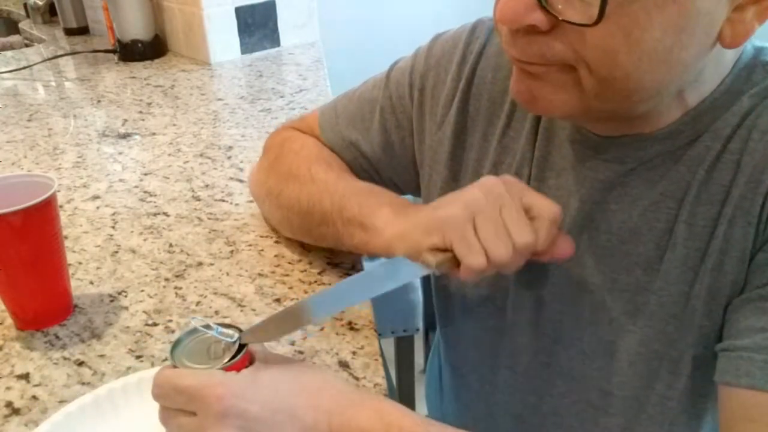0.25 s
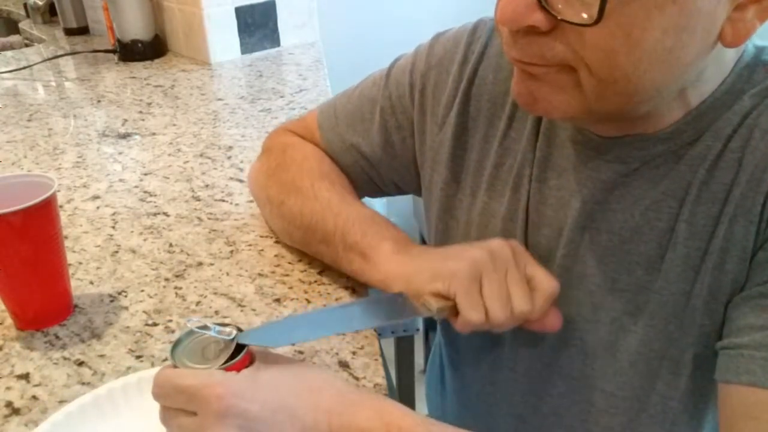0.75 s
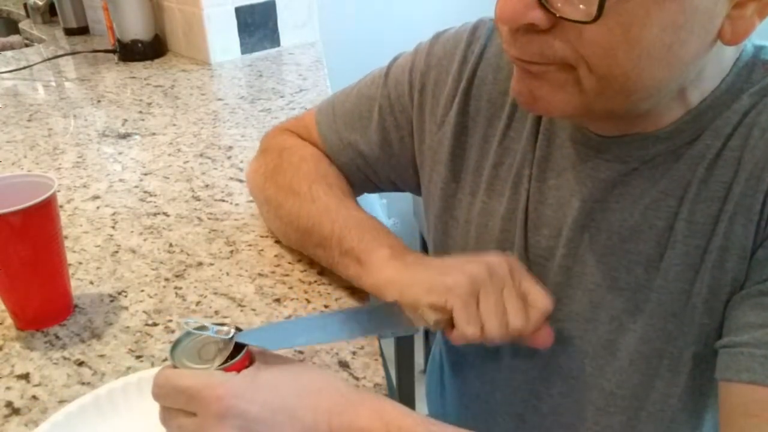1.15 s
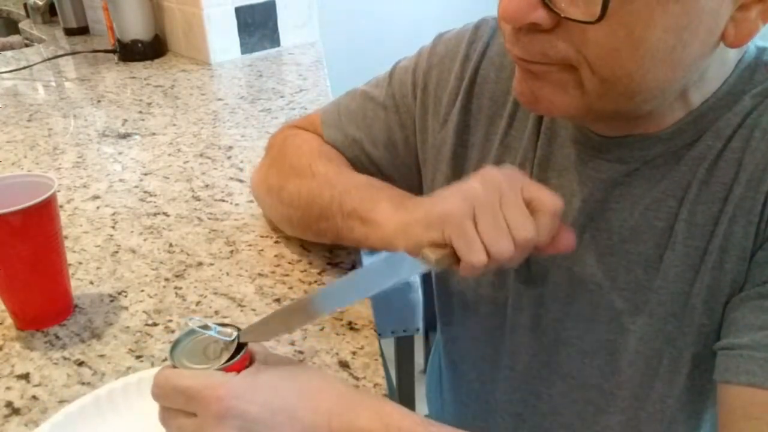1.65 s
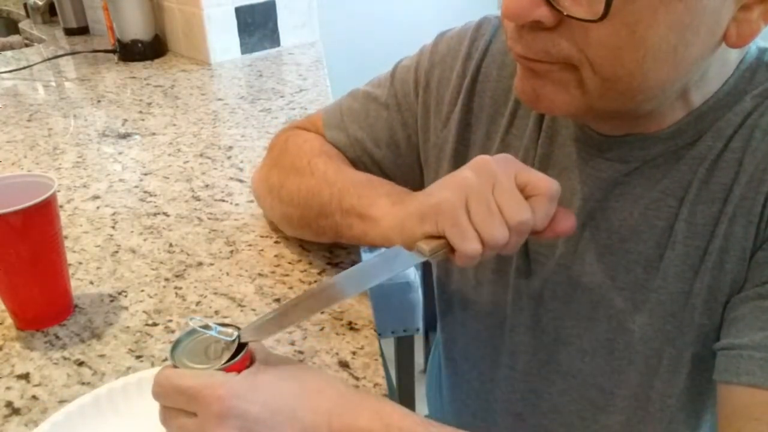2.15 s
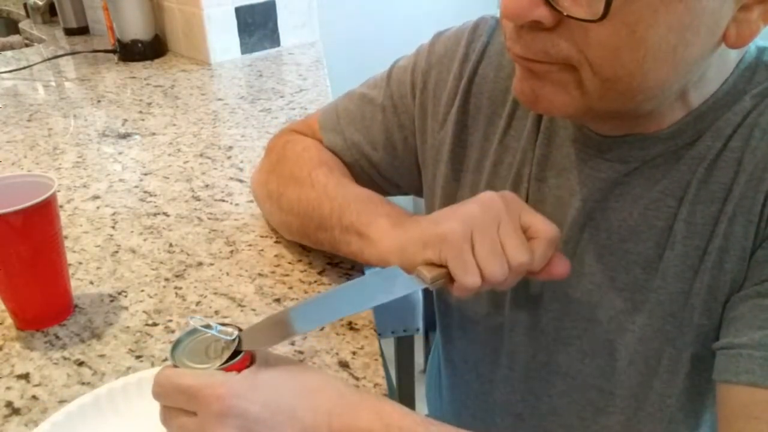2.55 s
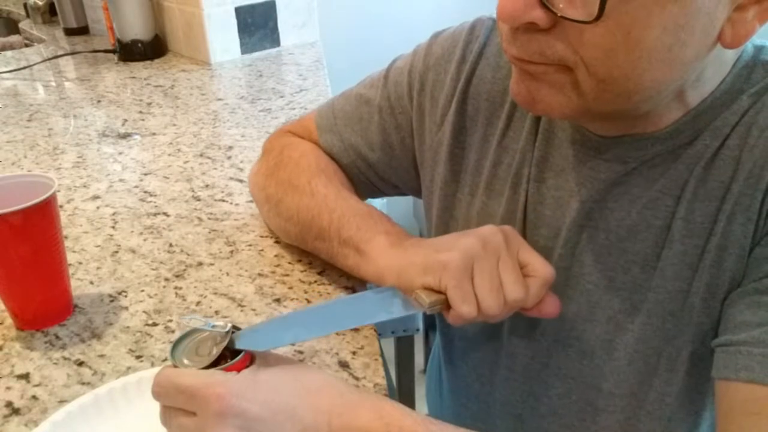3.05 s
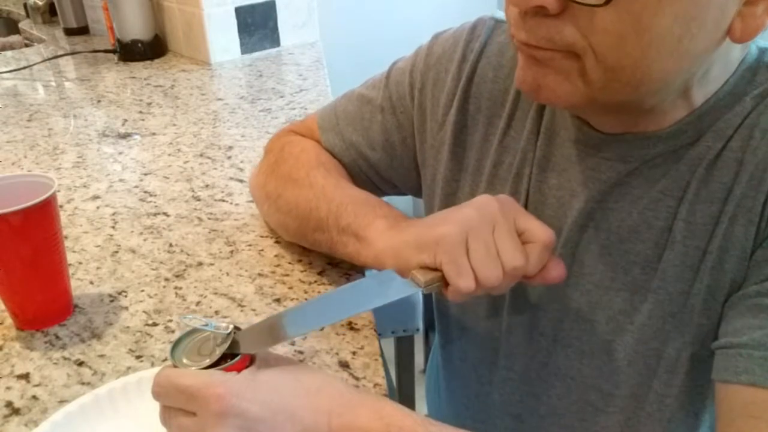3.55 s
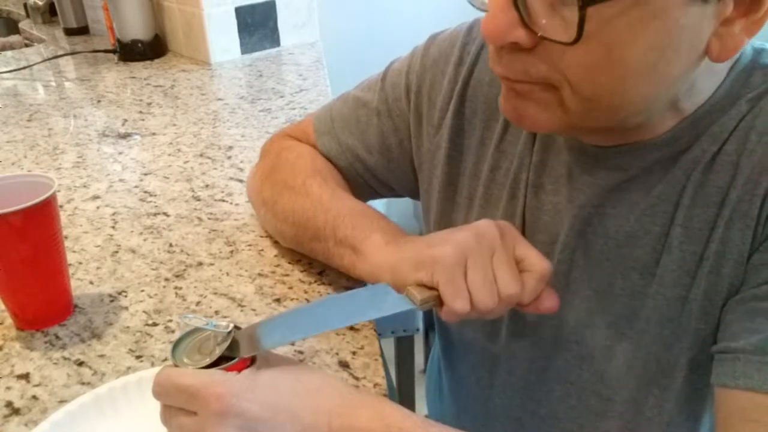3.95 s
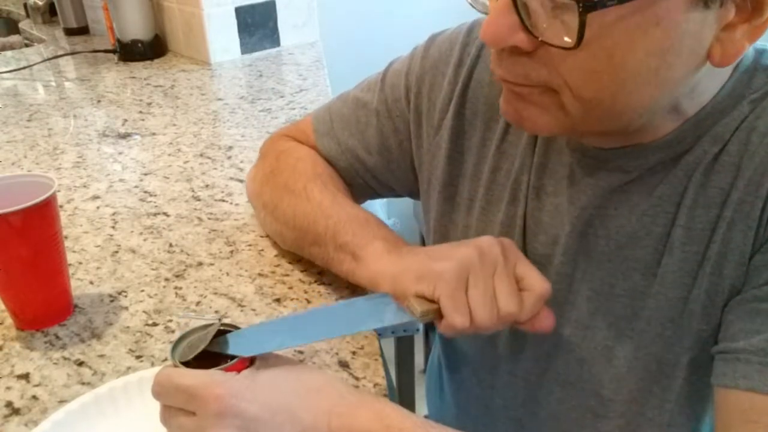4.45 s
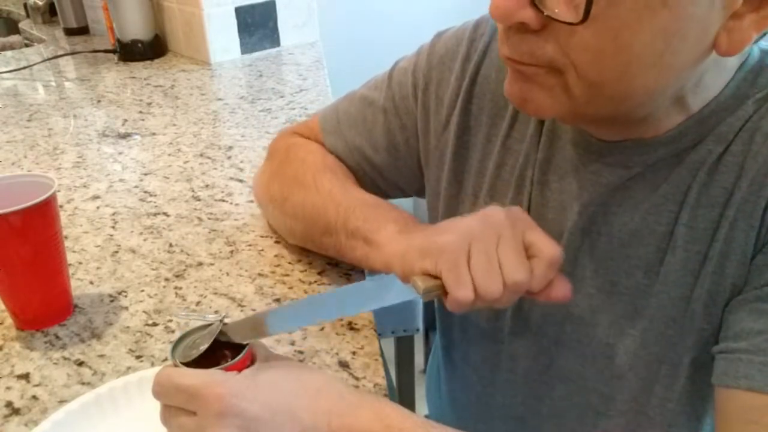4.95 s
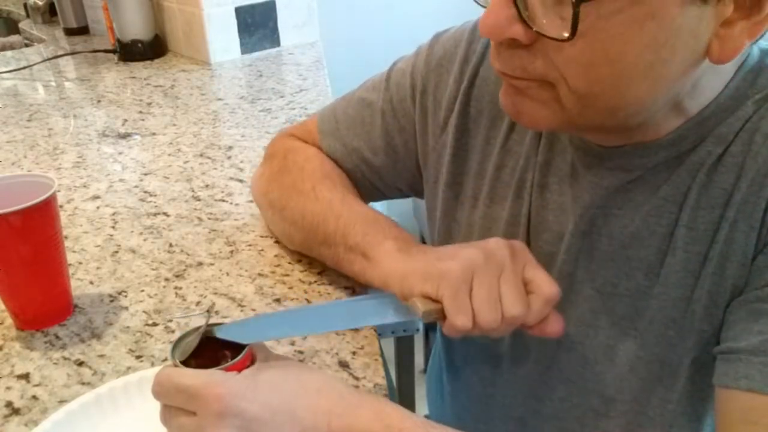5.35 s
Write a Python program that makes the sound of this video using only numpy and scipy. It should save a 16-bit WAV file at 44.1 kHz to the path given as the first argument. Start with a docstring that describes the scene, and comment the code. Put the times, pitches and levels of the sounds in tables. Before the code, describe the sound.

Close on a small metal tin, a knife blade scrapes and clicks under the lid. A cluster of loud snaps at about two seconds releases a ringing metallic note. Smaller muffled ticks follow, then another sharp burst past four seconds and fading scrapes. Hard kitchen reflections, a low fridge hum and steady room noise surround it; stereo hiss is stronger on the left.

```python
"""A knife pries up the lid of a small tin in a hard-walled kitchen.
Each slip of the seam pings the air hollow under the lid, whose pitch broadly climbs as the lid opens, and jolts
the sheet metal. Between slips the blade scrapes: friction grains excite the same hollow and metal.
Once the lid springs free with a ringing note, and the blade sometimes brushes a brief note out of it.
A fridge motor beats against the mains tone over steady room noise; the left microphone hisses more."""
import sys
import numpy as np
from scipy import signal
from scipy.fft import rfft, irfft
from scipy.io import wavfile

SR = 44100
rng = np.random.default_rng(int(sys.argv[2]) if len(sys.argv) > 2 else 0)


def output_pcm(signal):
    """Save a mono or channel-first signal as 16-bit PCM at the path in sys.argv[1].

    Samples are clipped to [-1, 1] before scaling.
    """
    pcm = np.clip(np.atleast_2d(signal).T, -1, 1) * 32767
    wavfile.write(sys.argv[1], SR, np.round(pcm).astype(np.int16))


N = 247401

# Sheet-metal modes of the lid. Each row: pitch in Hz, relative level in dB with the lid down, ajar,
# and with the blade wedged, then t60 in seconds while the seam still damps the metal.
LID_MODES = [(406, -7.5, -8, -1, 0.051), (599, -11.5, -19.5, -5, .04), (920, -16, -13.5, -22, 0.026),
             (1059, 4.5, -26, 19.5, 0.022), (1414, 0, -31, -17.5, 0.081), (1760, 4.5, 5.5, -14, 0.04),
             (1926, 6.5, 4, 6, 0.04), (2228, 12, 12.5, -6, 0.017), (2664, -1.5, 3.5, -6, 0.019),
             (3103, -6.5, 7, 14.5, 0.015), (3230, 7.5, 3.5, -9, 0.012), (3812, -10, -0.5, -24, .025),
             (3984, -3.5, -3, -19, 0.022), (4170, 2.5, -10.5, 0, 0.028), (4546, -7.5, 9.5, 9.5, 0.023),
             (5080, -10.5, 0, -19, 0.013), (5440, -1, -1, -28, 0.012)]
# The air hollow, one row each for lid down, ajar and wedged by the blade. Each row: rise in seconds, t60 in seconds,
# pitch ratio of the second resonance, its relative level in dB, width in Hz when scraped.
HOLLOW_STATES = [(.0011, 0.013, 1.242, -10, 480), (0.00182, 0.018, 1.35, -23.5, 347),
                 (0.00077, 0.01, 1.3, -16.5, 1050)]

BURIED_DB = -13   # while the blade is wedged deep under the lid its edge is muffled
POP_S = 2.033   # the lid springs free of the seam


def from_db(db):
    """Decibels to gain."""
    return 10 ** (np.asarray(db) / 20)


def rms_one(x):
    """Scale to rms 1."""
    return x / np.sqrt(np.mean(x ** 2) + 1e-20)


def at_hz(points, hz):
    """Read a table of (Hz, value) on a log-frequency axis."""
    points = np.array(points)
    return np.interp(np.log(hz), np.log(points[:, 0]), points[:, 1])


def resonance(x, hz, width_hz):
    """Two-pole band with gain 1 on top."""
    r = np.exp(-np.pi * width_hz / SR)
    poles = [1, -2 * r * np.cos(2 * np.pi * hz / SR), r * r]
    return signal.lfilter([(1 - r * r) / 2, 0, (r * r - 1) / 2], poles, x + 1e-18)


def ring(clicks, hz, t60):
    """A unit click sets a sine of height 1 ringing, 60 dB down after t60 seconds."""
    r, w = from_db(-60 / (t60 * SR)), 2 * np.pi * hz / SR
    return signal.lfilter([0, np.sin(w)], [1, -2 * r * np.cos(w), r * r], clicks + 1e-18)


def lid_state(s):
    """0 with the lid down, 1 once it stands ajar, 2 while the blade is wedged under it."""
    wedged = (s > 2.8) & (s < 3.3)
    ajar = s > 3.35
    return np.where(wedged, 2, 1 * ajar)


def room_air():
    """Steady broadband room noise; the channels share most in the bass and little higher up."""
    # Noise spectrum. Each row: frequency in Hz, relative level in dB per Hz.
    spectrum = [(36, -28), (55, -7), (100, -10.5), (150, -7), (260, -10), (450, -11.5), (600, -19.5),
                (800, -24.5), (1030, -23), (1300, -31), (2000, -30), (3000, -38.5), (6500, -41),
                (16000, -39.5)]
    # Each row: frequency in Hz, likeness of left and right from 0 to 1.
    likeness = [(60, 0.69), (110, 0.88), (200, 0.4), (380, 0.57), (700, 0.038)]
    level_db = -62
    padded = N + 4096
    hz = np.maximum(np.fft.rfftfreq(padded, 1 / SR), 1)
    mid, side = rfft(rng.standard_normal((2, padded)))
    alike = np.clip(at_hz(likeness, hz), 0, 1)
    both = np.sqrt(1 + alike) * mid + np.sqrt(1 - alike) * side * [[1], [-1]]
    shaped = both * from_db(at_hz(spectrum, hz)) * (hz > 25)
    return from_db(level_db) * rms_one(irfft(shaped, padded)[:, :N])


def fridge():
    """The motor's second order beats against the mains tone; the cabinet drones in two narrow noise bands."""
    # Each row: order of the motor speed, level in dB, left minus right in dB.
    motor = [(2, -69.5, -7.5), (8, -81.5, -8)]
    # Each row: pitch in Hz, width in Hz, level in dB.
    cabinet = [(207.9, 19, -71.5), (414.9, 2.3, -69.5)]
    mains_hz, mains_db = 120.03, -60.5
    motor_hz, beat_dip_s = 59.29, 2.63
    t = np.arange(N) / SR - beat_dip_s
    # opposite sign to the motor, so the beat dips at t = 0
    out = -np.sqrt(2) * from_db(mains_db) * np.cos(2 * np.pi * mains_hz * t) * np.ones((2, 1))
    for order, db, pan_db in motor:
        sides = from_db(db + pan_db * np.array([[.5], [-.5]]))
        out += np.sqrt(2) * sides * np.cos(2 * np.pi * order * motor_hz * t)
    for hz, width_hz, db in cabinet:
        out += from_db(db) * rms_one(resonance(rng.standard_normal(N), hz, width_hz))
    return out


def kitchen(x):
    """Diffuse echoes: noise in octave bands, each dying at its own rate, unrelated at the two microphones."""
    # Each row: frequency in Hz, reverberation time t60 in seconds.
    room_t60 = [(400, 0.56), (1600, 0.46), (4000, 0.51), (12000, 0.42)]
    level_db, onset_s = -2, .004
    t, echoes = np.arange(SR) / SR, 0
    white = rng.standard_normal((2, SR))
    for low in 150 * 2. ** np.arange(7):
        octave = signal.butter(2, [low, min(2 * low, 20000)], "band", fs=SR, output="sos")
        decay = from_db(-60 * t / at_hz(room_t60, low * np.sqrt(2)))
        echoes = echoes + signal.sosfilt(octave, white) * decay
    echoes = echoes * np.clip(t / onset_s - 1, 0, 1)   # silent for one onset, full after two
    echoes = echoes / np.sqrt(np.sum(echoes ** 2, axis=1, keepdims=True))
    return from_db(level_db) * signal.fftconvolve(x[None], echoes, axes=1)[:, :N]


def blade_brushes():
    """The blade brushes the lid and one note rings briefly, softened in its attack by a resonance."""
    # Each row: time in seconds, pitch in Hz, level in dB.
    touches = [(0.965, 4325, -59), (2.155, 1760, -37.5), (2.163, 1664, -30), (2.269, 1713, -31.5),
               (3.021, 4525, -50.5), (3.098, 3180, -54), (4.286, 3030, -53), (4.588, 2470, -51),
               (4.775, 3800, -66), (4.778, 2580, -56)]
    out = np.zeros(N)
    for s, hz, db in touches:
        click = 1. * (np.arange(N) == round(s * SR))
        out += from_db(db) * resonance(ring(click, hz, t60=0.057), hz, 670)
    return out


def pop():
    """Freed from the seam, the lid sounds its main note while a noisy shudder stirs all modes; returns both."""
    note_hz, note_db, note_t60_s = 1669, -16, 0.35
    caught_s, caught_db = 0.0145, -15   # the note is damped when the lid lands on the blade
    shudder_db, shudder_t60_s = -65, .08
    free_ring = 3.7   # undamped, the modes ring this many times longer
    click = np.zeros(N)
    click[round(POP_S * SR)] = 1
    caught = from_db(caught_db * (np.arange(N) / SR > POP_S + caught_s))
    struck = caught * ring(click, note_hz, note_t60_s)
    note = from_db(note_db) * resonance(struck, note_hz, 340)   # swells over a few cycles
    fading = from_db(-60 / (shudder_t60_s * SR))
    shudder = signal.lfilter([1], [1, -fading], click + 1e-18) * rng.standard_normal(N)
    stirred = np.zeros(N)
    for hz, down_db, *_, t60 in LID_MODES:
        stirred += from_db(shudder_db + down_db) * ring(shudder, hz, free_ring * t60)
    return note, stirred


def metal(jolts, rubbing, modes, modes_db, crack_db, crack_hz):
    """Each contact strikes every mode anew and adds a short crack; the sides differ, as sheet radiates unevenly."""
    ajar_ring = 2.2   # off the seam the modes ring this many times longer
    rub_crack_db = -5.5   # rubbing cracks less than a jolt
    crack_rise_s, crack_t60_s = .002, 0.035
    contacts, ajar = jolts + rubbing, lid_state(np.arange(N) / SR) == 1
    at, out = np.flatnonzero(contacts), np.zeros((2, N))
    for hz, *state_db, t60 in modes:
        blows = np.zeros((2, N))
        # a mode with a single level keeps it in every lid state
        level_db = np.take(state_db, lid_state(at / SR), mode="clip")
        blows[:, at] = contacts[at] * from_db(level_db + rng.normal(0, 3, (2, len(at))))
        ringing = ring(blows * ~ajar, hz, t60) + ring(blows * ajar, hz, ajar_ring * t60)
        out += from_db(modes_db) * ringing
    fading = from_db(-60 / (crack_t60_s * SR))
    rising = np.exp(-1 / (crack_rise_s * SR))
    force = np.abs(jolts + from_db(rub_crack_db) * rubbing)
    envelope = signal.lfilter([1 - rising], np.convolve([1, -fading], [1, -rising]), force + 1e-18)
    crack = envelope * rng.standard_normal((2, N))
    band = signal.butter(2, crack_hz, "band", fs=SR, output="sos")
    return out + from_db(crack_db) * signal.sosfilt(band, crack)


def scraping():
    """Uneven friction grains sound the hollow at each stroke's pitch; returns that and the drive of lid and edge."""
    # Strokes of the blade on the rim. Each row: start in seconds, swell in seconds, fade in seconds,
    # hollow pitch in Hz, then hollow level and relative drive of the lid metal in dB at the height of the stroke.
    strokes = [(0, 0.088, 0.042, 1490, -56, -67), (0.136, 0.0193, 0.14, 1490, -49.5, -96),
               (0.371, 0.012, 0.041, 1454, -51.5, -48.5), (0.61, 0.049, 0.0094, 1488, -53, -64),
               (0.94, 0.006, 0.071, 1525, -42.5, -54), (1.262, 0.034, 0.092, 1533, -42.5, -54.5),
               (1.537, 0.012, 0.026, 1550, -47.5, -79), (1.841, 0.017, 0.12, 1580, -64.5, -62.5),
               (2.239, 0.028, 0.059, 1580, -49, -48), (2.808, 0.11, 0.12, 1517, -53, -76),
               (2.99, .1, .17, 1430, -52.5, -56.5), (3.42, 0.007, 0.13, 2064, -65.5, -88.5),
               (3.526, 0.021, 0.074, 2050, -53.5, -63), (3.558, 0.046, 0.071, 2030, -55.5, -59.5),
               (3.651, 0.091, 0.026, 2150, -61.5, -60), (3.77, 0.0084, 0.034, 2275, -61, -67),
               (4.171, 0.07, 0.032, 2102, -50, -53.5), (4.245, 0.032, 0.26, 2235, -47, -59),
               (4.557, 0.041, 0.081, 1915, -54.5, -43.5), (4.66, 0.06, 0.031, 2320, -62.5, -57.5),
               (4.759, 0.0265, 0.063, 2000, -60, -56), (5.14, 0.068, 0.18, 2310, -58, -73),
               (5.2, 0.021, 0.15, 2050, -57.5, -60.5), (5.462, 0.012, 0.089, 2170, -64, -57.5),
               (5.499, 0.0411, 0.064, 1995, -64.5, -54.5)]
    grains_per_s = 2400
    swell_db, fade_db = 17, 25.5   # a stroke climbs this much to its height, then sinks this much
    body_hz, body_db = 810, -17.5   # dull knock of the filled can under the scrape
    edge_rub_db = -15   # blade-edge drive relative to the lid metal
    sizes = from_db(4.2 * np.minimum(rng.exponential(1, N), 4)) * rng.choice([-1, 1], N)
    grains = rms_one(sizes * (rng.random(N) < grains_per_s / SR))
    hollow, rubbing = np.zeros(N), np.zeros((2, N))
    for start, swell, fade, hz, hollow_db, lid_db in strokes:
        s = np.cumsum([max(start, 0), swell, fade])
        span = slice(round(s[0] * SR), round(s[-1] * SR))
        t = np.arange(N)[span] / SR
        rub = grains[span]
        _, _, ratio, upper_db, width_hz = HOLLOW_STATES[lid_state(start)]
        lower, upper = rub, rub
        for width in (width_hz, width_hz, 2 * width_hz):
            lower = resonance(lower, hz, width)
            upper = resonance(upper, ratio * hz, width)
        body = from_db(body_db) * resonance(resonance(rub, body_hz, body_hz), body_hz, body_hz)
        ends = np.clip(np.minimum(t - s[0], s[-1] - t) / .005, 0, 1)   # no clicks at the ends
        pressure = ends * from_db(np.interp(t, s, [-swell_db, 0, -fade_db]))
        air = rms_one(lower - from_db(upper_db) * upper + body)
        hollow[span] += pressure * from_db(hollow_db) * air
        edge_db = lid_db + edge_rub_db + BURIED_DB * (lid_state(start) == 2)
        rubbing[:, span] += pressure * from_db([[lid_db], [edge_db]]) * rub
    return hollow, rubbing


def slips():
    """Each slip of the seam pings two resonances of the hollow; returns the pings and the jolts to lid and edge."""
    # Each row: time in seconds, drive of the hollow ping in dB, hollow pitch in Hz, drive of the lid metal in dB.
    seam_slips = [(0.081, -43.5, 1580, -64), (0.182, -39, 1400, -66), (0.1959, -36.5, 1454, -59),
                  (0.2494, -39.5, 1487, -89), (0.6523, -28, 1543, -48), (0.9421, -39.5, 1570, -50.5),
                  (0.9664, -52, 1674, -49), (1.292, -38, 1510, -84), (1.3616, -35, 1482, -57.5),
                  (1.5509, -32.5, 1550, -76), (1.967, -52, 1760, -100), (2.0248, -13, 1595, -37),
                  (2.0299, -16.5, 1614, -37.5), (2.0327, -17, 1650, -29.5), (2.373, -30, 1590, -50),
                  (2.8894, -31.5, 1546, -61), (2.92, -38, 1580, -73), (2.946, -31.5, 1960, -60),
                  (3.016, -30, 1855, -58), (3.029, -31.5, 1620, -62), (3.0661, -34, 1760, -62),
                  (3.096, -44, 2070, -60), (3.107, -43, 1900, -63), (3.226, -50, 1440, -63),
                  (3.5718, -37.5, 2098, -60), (3.5804, -36.5, 1986, -55.5), (4.1839, -42, 2050, -69),
                  (4.2068, -35, 2090, -82), (4.2225, -36, 2160, -81), (4.2353, -31, 2066, -67.5),
                  (4.2454, -33, 2213, -51), (4.2609, -19, 2252, -34.5), (4.2724, -21.5, 2038, -37.5),
                  (4.2875, -43, 2040, -38.5), (4.2965, -45, 2280, -39)]
    edge_follows_metal, edge_below_db = 0.29, 26   # edge: a blend of metal and hollow levels, this much lower
    hollow, jolts, t = np.zeros(N), np.zeros((2, N)), np.arange(2048) / SR
    chance_db = rng.normal(0, 1.0, len(seam_slips))
    for (s, peak_db, hz, lid_db), vary_db in zip(seam_slips, chance_db):
        rise, t60, ratio, upper_db, _ = HOLLOW_STATES[lid_state(s)]
        shape = (1 - np.exp(-t / rise)) ** 3 * from_db(-60 * t / t60)   # the air needs a few cycles to build up
        upper = from_db(upper_db + vary_db) * np.sin(2 * np.pi * ratio * hz * t)
        tone = np.sin(2 * np.pi * hz * t) - upper
        i = round((s - rise) * SR)
        hollow[i:i + len(t)] += from_db(peak_db) * shape / shape.max() * tone
        edge_db = edge_follows_metal * lid_db + (1 - edge_follows_metal) * peak_db - edge_below_db
        edge_db += BURIED_DB * (lid_state(s) == 2)
        jolts[:, round(s * SR)] = from_db([lid_db, edge_db])
    return hollow, jolts


def scene():
    """Lid and blade, slightly nearer the right microphone, in the kitchen with its fridge and room noise."""
    # High modes stirred by the blade edge. Each row: pitch in Hz, relative level in dB, t60 in seconds before
    # the lid stands ajar.
    edge_modes = [(6880, -4.5, 0.0061), (8940, 6, 0.023), (10000, 8.5, 0.0054), (12100, 2, 0.012)]
    source_pan_db, left_lag = -0.5, 2   # left minus right in dB, delay in samples
    echo_s, echo_db = (.0032, 0.0063), -7   # bounce off the stone counter (left, right)
    note_left_db, note_room_db = -1, -11   # the note beams to the right microphone, less reaches the walls
    pings, jolts = slips()
    rasp, rubbing = scraping()
    note, stirred = pop()
    lid, edge = zip(jolts, from_db(-33.0) * rubbing)
    can = pings + rasp + stirred + blade_brushes()
    can = can + metal(*lid, LID_MODES, modes_db=-14.0, crack_db=0.0, crack_hz=[700, 4200])
    can = can + metal(*edge, edge_modes, modes_db=-10, crack_db=6.1, crack_hz=[5500, 15500])
    can = signal.sosfilt(signal.butter(3, 330, "high", fs=SR, output="sos"), can)   # too small to radiate bass
    walls = kitchen(can[1] + from_db(note_room_db) * note)
    can = can + from_db(note_left_db * np.array([[1], [0]])) * note
    direct = np.array([np.roll(can[0], left_lag), can[1]])
    direct = direct * from_db(source_pan_db * np.array([[.5], [-.5]]))
    bounce = np.array([np.roll(side, round(lag * SR)) for side, lag in zip(can, echo_s)])
    return direct + from_db(echo_db) * bounce + walls + fridge() + room_air()


def record(dry):
    """The left port's resonance lifts the treble, each microphone adds hiss in three humps, the top is cut."""
    # Humps of microphone hiss. Each row: centre in Hz, width in Hz of each of two stacked bands, left level in dB.
    hiss_humps = [(8350, 1400, -72), (10850, 1200, -73.5), (15440, 1560, -77)]
    port_hz, port_width_hz = 8400, 1800
    hiss_right_db, cutoff_hz = -22, 16600   # right hiss relative to the left
    out = dry + resonance(dry, port_hz, port_width_hz) * [[1], [0]]
    for hz, width_hz, db in hiss_humps:
        white = rng.standard_normal((2, N))
        hiss = rms_one(resonance(resonance(white, hz, width_hz), hz, width_hz))
        out = out + from_db(db) * hiss * from_db([[0], [hiss_right_db]])
    return signal.sosfilt(signal.cheby2(14, 60, cutoff_hz, fs=SR, output="sos"), out)


dry = scene()
out = record(dry)
output_pcm(out)
```